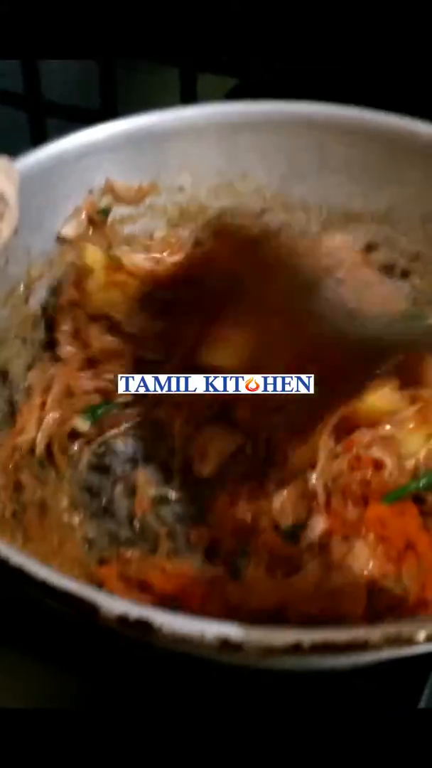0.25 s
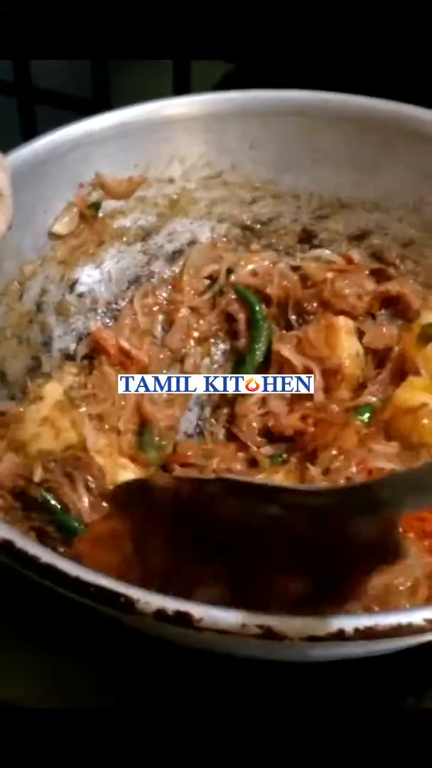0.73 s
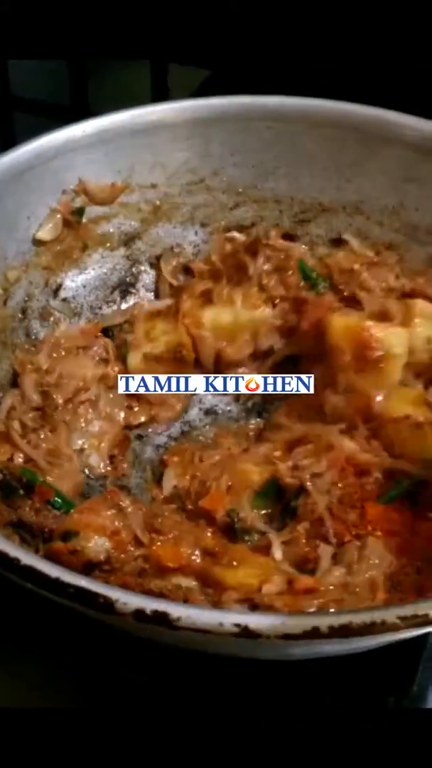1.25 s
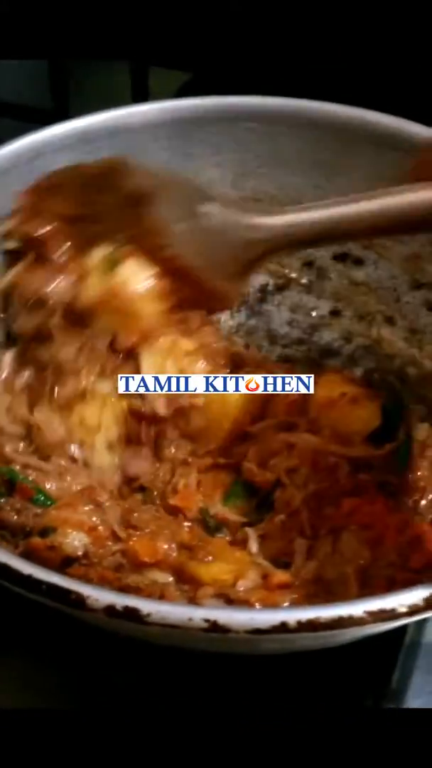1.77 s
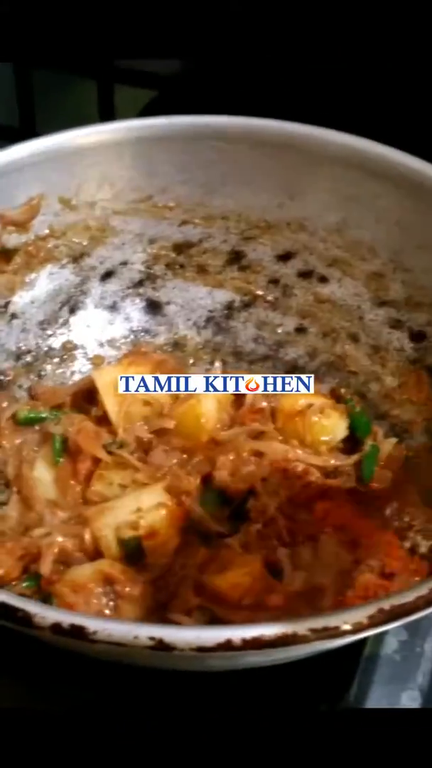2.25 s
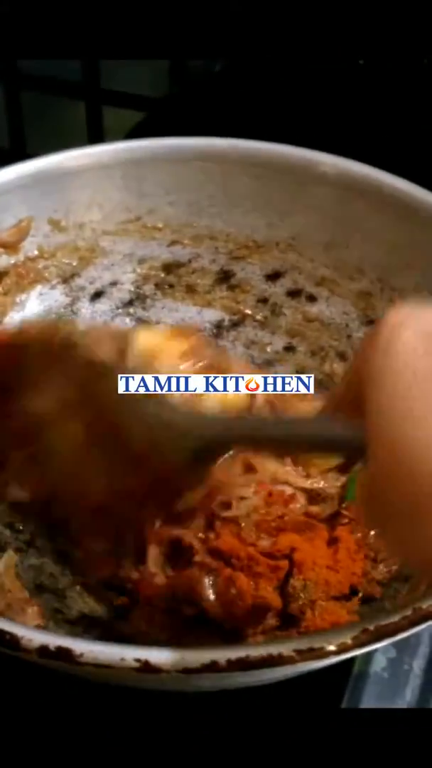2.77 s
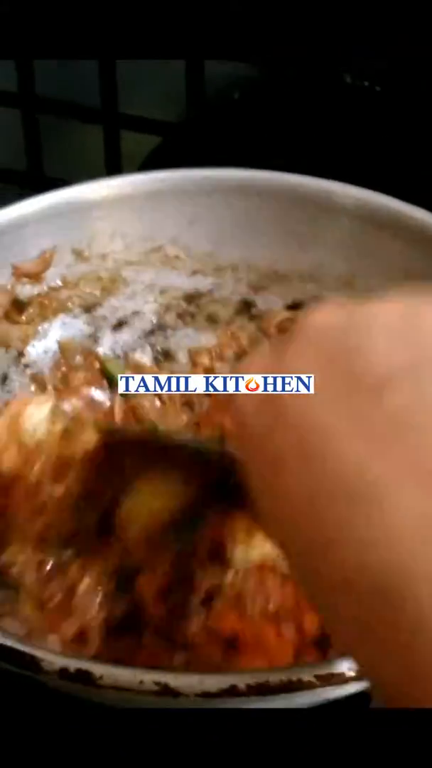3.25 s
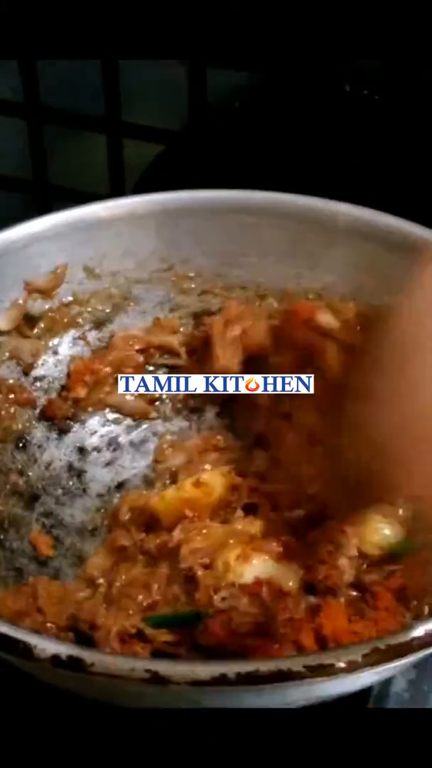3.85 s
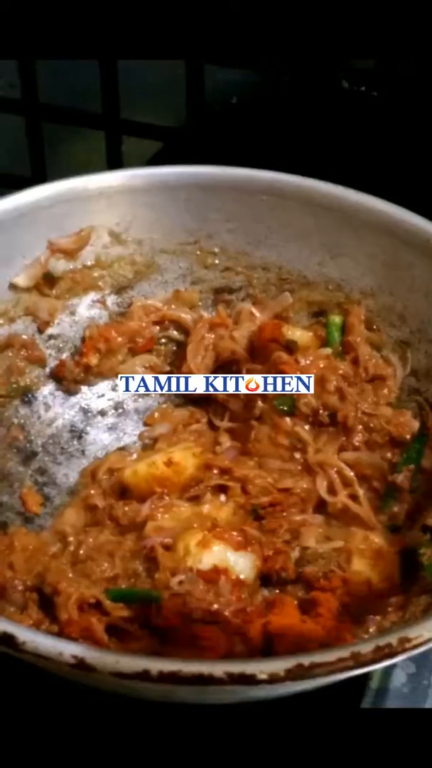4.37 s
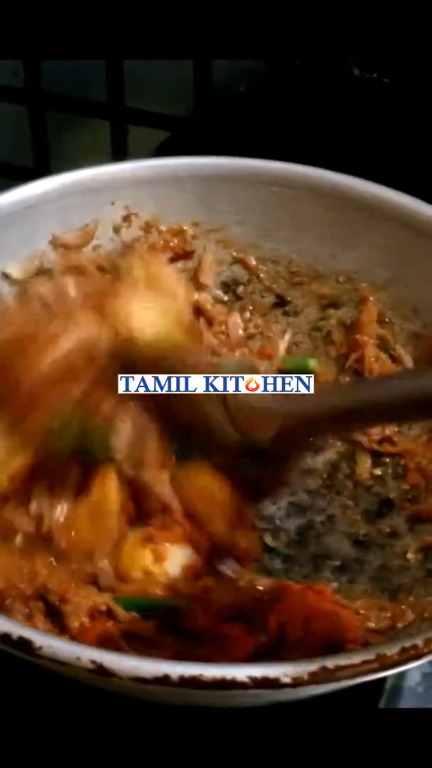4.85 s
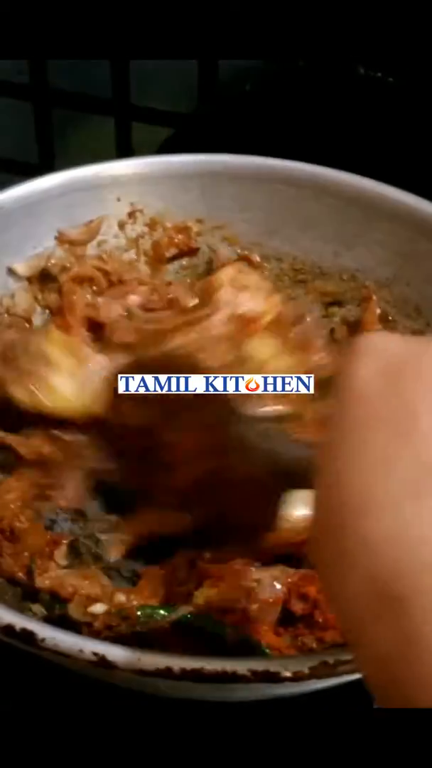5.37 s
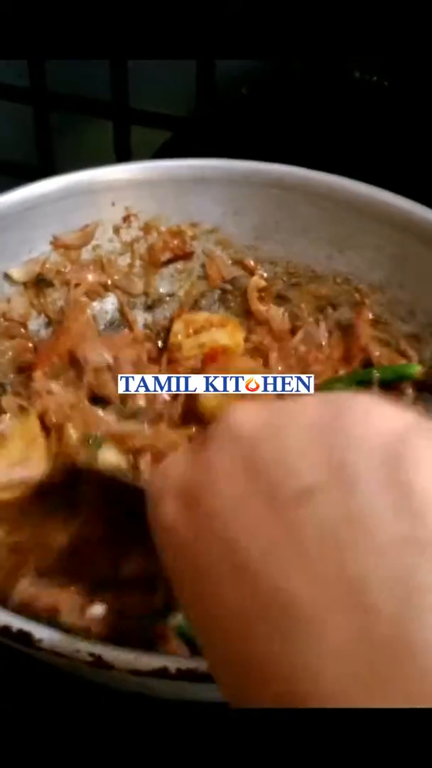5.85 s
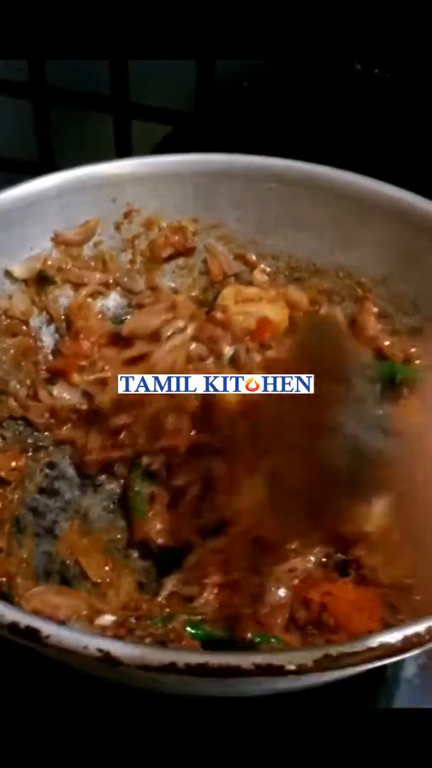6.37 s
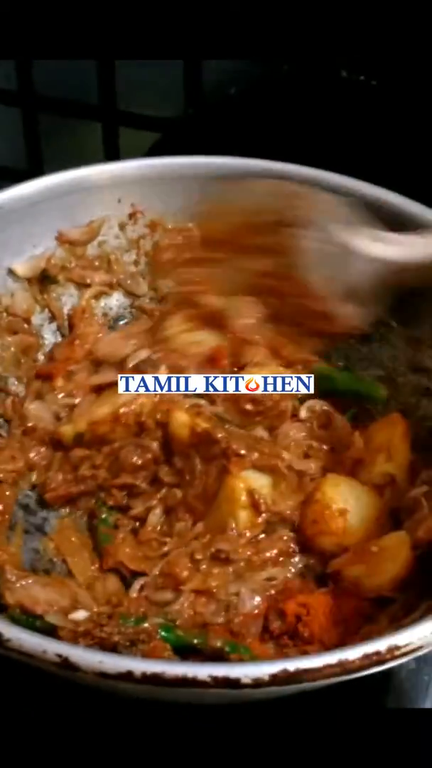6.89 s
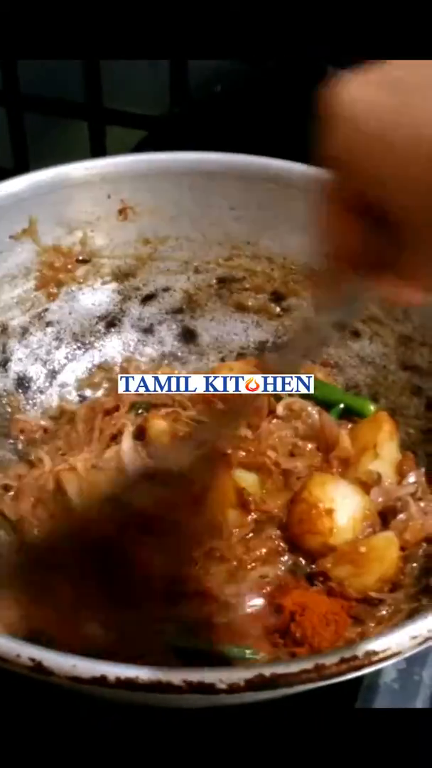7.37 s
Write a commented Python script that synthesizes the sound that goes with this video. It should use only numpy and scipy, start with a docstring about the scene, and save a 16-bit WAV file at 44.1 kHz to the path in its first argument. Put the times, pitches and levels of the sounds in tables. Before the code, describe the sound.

A faint household rush and barely audible rubbing come first. Then a metal ladle knocks a thin aluminium pan and drags along it in short, uneven strokes, rasping on the wall and groaning low through thick food. Dull bumps and faint crackles join in, with quieter gaps between bursts. Close stereo phone pickup in a small kitchen, the metallic rasp brighter on the right.

```python
"""A faint household rush and mains hum come first, with barely audible scraping; then knocks and rasping drags.
A metal ladle stirs thick paste in an aluminium pan, close to a two-microphone phone in a small kitchen.
Its edge knocks the pan wall, then drags along it: stick-slip friction shakes the food-damped pan,
whose low modes groan and whose thin wall rasps. Dull bumps, rubs and faint crackles join in.
The right microphone faces the pan and hears far more of its upper middle."""
import sys
import numpy as np
from scipy import signal
from scipy.fft import rfft, irfft, next_fast_len
from scipy.io import wavfile
from scipy.ndimage import uniform_filter1d, map_coordinates

SR = 44100
rng = np.random.default_rng(int(sys.argv[2]) if len(sys.argv) > 2 else 0)


def to_wav(sig):
    """Store sig (one row per channel, or 1-D mono) as 16-bit WAV at the path in sys.argv[1].

    Samples outside -1..1 are clipped; the rate is SR.
    """
    pcm = np.clip(np.atleast_2d(sig), -1, 1) * 32767
    pcm = np.round(pcm).astype(np.int16)
    wavfile.write(sys.argv[1], SR, pcm.T)  # frames by channels


def convert_level_to_amplitude(level_db):
    """Map a level in decibels to its linear amplitude factor."""
    exponent = np.asarray(level_db, float) / 20
    return 10 ** exponent


N = 336483  # length in samples

# Source levels below are those of the force or ring before the pan modes and microphones colour it.
# Edge drags along the thin wall: t/s, rise/s, drag/s, rasp peak level/dB, centre f/Hz, hiss re rasp level/dB
WALL_DRAGS = [(.02, 0.027, 0.23, -63, 2200, -25), (.522, 0.0046, 0.5, -60.5, 1200, -27),
              (0.631, 0.0043, 0.14, -34.5, 1860, -24.5), (0.958, 0.065, 0.12, -37, 3080, -15),
              (1.366, 0.025, 0.15, -28.5, 2580, -20), (1.5, 0.11, 0.25, -46, 2560, -20),
              (1.63, 0.049, 0.1, -43.5, 1520, -16.5), (1.722, 0.011, 0.079, -35.5, 1500, -20),
              (1.786, 0.0018, 0.27, -41, 2060, -17.5), (2.382, 0.004, 0.11, -35.5, 2300, -17.5),
              (2.62, 0.035, 0.12, -37, 1720, -20.5), (2.67, 0.031, 0.14, -41, 2220, -11.5),
              (3.267, 0.0051, 0.22, -51, 1260, -39), (3.558, 0.0022, 0.057, -32.5, 1494, -15),
              (3.58, 0.045, 0.091, -35.5, 3330, -9), (4.12, 0.0068, 0.11, -37, 2400, -17.5),
              (4.339, 0.0082, 0.077, -35.5, 1210, -32), (4.407, 0.0036, 0.064, -31.5, 2430, -25),
              (4.43, 0.065, 0.05, -37.5, 2830, -17), (4.542, 0.098, 0.15, -34, 2670, -16.5),
              (5.034, 0.003, 0.037, -59, 2550, -14), (5.313, 0.041, 0.096, -48, 3350, -13),
              (5.966, 0.0034, 0.22, -49, 1380, -24), (6.209, 0.011, 0.051, -54, 2050, -28),
              (6.684, 0.0087, 0.034, -24.5, 2590, -27), (6.71, 0.053, 0.27, -37, 2060, -14.5),
              (6.959, 0.083, 0.21, -33.5, 2900, -15.5), (7.088, 0.023, 0.27, -45, 1200, -19)]
# Ladle ploughs over the loaded bottom: t/s, rise/s, drag/s, peak level/dB, centre f/Hz
BOTTOM_DRAGS = [(.03, 0.05, 0.49, -60, 524), (.4, 0.16, 0.0052, -61, 540), (.522, 0.017, 0.15, -42.5, 460),
                (0.631, .005, 0.12, -31, 426), (.72, 0.046, 0.16, -43, 460), (0.95, 0.1, 0.1, -33.5, 526),
                (1.1, 0.037, 0.13, -47, 416), (1.368, 0.0066, 0.22, -36, 600),
                (1.55, 0.2, 0.044, -45.5, 497), (1.785, 0.016, 0.26, -36, 470),
                (1.879, 0.047, 0.063, -28.5, 460), (1.979, 0.013, 0.048, -41, 446),
                (2.04, 0.018, 0.052, -44, 435), (2.276, 0.012, 0.025, -55, 394),
                (2.382, 0.013, 0.12, -38.5, 495), (2.633, 0.0036, 0.24, -45, 670),
                (3.31, 0.0081, 0.16, -50, 287), (3.562, 0.0084, 0.17, -34.5, 352),
                (3.7, 0.028, 0.28, -49.5, 296.5), (4.119, 0.0026, 0.13, -52.5, 414),
                (4.295, 0.02, 0.02, -45, 854), (4.334, 0.0024, 0.081, -28.5, 745),
                (4.409, 0.0098, 0.14, -38.5, 555), (4.56, 0.14, 0.15, -40, 680),
                (5.009, 0.0034, 0.3, -63, 303), (5.149, 0.055, 0.036, -58.5, 317),
                (5.335, 0.022, 0.12, -41.5, 460), (5.529, 0.029, 0.012, -54, 385),
                (5.962, 0.008, 0.19, -37, 563), (6.299, 0.078, 0.12, -53.5, 383),
                (6.55, 0.072, 0.058, -58.5, 268.5), (6.69, 0.0073, 0.048, -34.5, 620),
                (6.72, 0.054, 0.99, -43.5, 585), (7.035, 0.0059, 0.17, -38, 504),
                (7.07, 0.046, 0.18, -35, 664), (7.15, 0.055, 0.05, -32.5, 610),
                (7.229, 0.0064, 0.088, -26, 500), (7.32, 0.013, 0.086, -46.5, 507),
                (7.46, 0.052, 0.033, -60.5, 255)]
# Shapes of a stroke: rise exponent, loss over the drag/dB, curve of the loss (under 1 = early),
# fall after lift-off/(dB/s)
RASP_SHAPE = (0.71, 14.46, 0.93, 260)
HISS_SHAPE = (0.52, 13.9, 1.18, 380)
GROAN_SHAPE = (0.83, 12.8, 0.82, 650)
# Light rubs in one narrow band: t/s, length/s, start f/Hz, end f/Hz, half-width/octave, level before taper/dB
RUBS = [(0.043, 0.15, 1758, 1930, 0.31, -53), (0.935, 0.041, 2037, 2125, 0.35, -42.5),
        (0.961, 0.04, 2003, 1544, 0.46, -38), (1.262, 0.19, 1830, 2160, .35, -52),
        (1.65, 0.05, 1270, 1310, 0.11, -37), (3.141, 0.11, 273, 288, 0.067, -49.5),
        (3.173, 0.042, 1610, 1590, .3, -56), (3.17, 0.094, 2950, 2720, .2, -59.5),
        (3.246, 0.074, 290, 279.6, 0.06, -49), (3.264, 0.039, 4580, 4560, .15, -65),
        (3.27, 0.18, 1410, 1134, 0.51, -54), (5.228, 0.007, 3210, 2800, 0.47, -36),
        (5.243, 0.013, 2886, 2100, 0.72, -35), (5.213, 0.13, 2800, 2480, 0.9, -46.5),
        (5.273, 0.01, 2750, 2260, 0.36, -41), (5.35, 0.0284, 3410, 3166, 0.32, -36.5),
        (7.091, 0.22, 624, 637, 0.027, -32.5)]
# Ladle edge meets the wall: t/s, level/dB, centre f/Hz, then low thud, tick and free ring re that level/dB
KNOCKS = [(0.105, -52, 1920, -10, -26, -22), (0.5235, -57.5, 484, 33.5, -33, -11),
          (0.633, -22, 1310, -17, -23, -10), (0.949, -35, 2100, -17, -31, -30),
          (1.3654, -14, 2540, -9.5, -15.5, -15.5), (1.388, -16.5, 2600, -36, -20, -6),
          (1.4206, -17.5, 3670, -11, -13, -14), (1.422, -23.5, 1080, -25, -26, -2.5),
          (1.735, -26.5, 1650, -6, -38, -11), (1.767, -27, 1500, -20, -11, -25),
          (1.791, -30, 3400, -34, -7, -19), (2.382, -14, 2620, -16.5, -15.5, -12.5),
          (3.267, -48.5, 1310, 10.5, -19, -19), (3.5605, -8, 1550, -19, -16, -17.5),
          (4.121, -18, 2560, -21, -20.5, -18), (4.341, -28, 1740, 7, -31, -14),
          (4.4095, -18.5, 2220, -12, -20.5, -12.5), (4.592, -27, 3270, -28.5, -9.5, -8.5),
          (5.038, -48.5, 3600, -35, -21.5, -21), (5.967, -38.5, 600, 8, -8.5, -33),
          (6.6873, -15, 2460, -4.5, -13.5, -22.5), (6.713, -28, 2930, -25, -22, -7),
          (6.996, -38, 3130, -18, 6, -18), (7.0356, -16.5, 2840, -37, -20, -12),
          (7.482, -56.5, 3700, 7, 1, -38)]
# Dull bumps, pan rocking on the stove or food thudding on its wall: t/s, level before onset smoothing/dB, f/Hz
BUMPS = [(0.158, -57, 100.4), (0.636, -36.5, 194.5), (1.02, -24, 478), (1.04, -29, 390), (1.068, -27, 555),
         (1.917, -31, 523), (1.936, -26, 395), (2.278, -60, 91), (2.382, -45, 185), (2.85, -65, 107),
         (3.387, -53, 111), (3.561, -40.5, 197.5), (3.915, -55.5, 199), (3.93, -55, 69.6), (3.988, -61, 81),
         (5.38, -55.5, 190), (5.384, -31, 398), (5.559, -56.5, 160), (5.973, -27.5, 377), (6.567, -56, 163),
         (6.631, -49, 195), (7.488, -56, 157)]
# Clear modes of the pan: f/Hz, bandwidth/Hz, relative level/dB
PAN_MODES = [(185, 18.6, 1.5), (273.2, 34, 9.5), (345, 54.5, 14.5), (460, 65, 0.5), (502, 6.8, 5),
             (633.6, 8.5, -0.5), (710, 34, -5.5), (920, 21, 3), (1073, 14, 5), (1488, 28, 7),
             (1625, 65, -1.5), (2506, 13.4, 7.5), (2620, 18, 2.5), (2940, 9.9, 4), (3297, 78, 6),
             (3570, 29, 10.5)]
# Relative spectral densities of the groan, rasp and hiss: f/Hz, level/dB per Hz
GROAN_COLOUR = [(59, -105), (100, -53), (293, -13), (340, -11), (613, -8.5), (861, -9), (953, -13.5),
                (1500, -20.5), (1950, -37.5), (3300, -120)]
RASP_COLOUR = [(410, -46), (700, -9.5), (973, -3), (1080, 8.5), (1420, -4), (2950, -1.5), (3660, -2.5),
               (5000, -22.5), (6500, -43.5), (11000, -120)]
HISS_COLOUR = [(2650, -24), (4500, 2), (5910, -1), (8730, -12.5), (10600, -13.5), (13700, -23),
               (14400, -19)]
# Decay times to -60 dB, of the pan under food and of the kitchen: f/Hz, t60/s
PAN_DECAY = [(200, 0.17), (600, 0.15), (2500, 0.0083), (5000, 0.021), (12000, 0.21)]
KITCHEN_DECAY = [(200, 0.13), (700, 0.45), (2000, 0.35), (10000, 0.061)]
# Likeness of left and right microphones (1 = same, 0 = unrelated): f/Hz, correlation
LIKENESS = [(60, 0.51), (230, 1), (920, 0.19), (3580, -0.026), (14000, 0.015)]
# Left minus right, for the pan and for the background: f/Hz, level/dB
PAN_BALANCE = [(60, -18), (150, -2.5), (370, 1.5), (920, -3), (2270, -15.5), (5630, -9), (14000, -7)]
BACKGROUND_BALANCE = [(60, 0), (230, 2.5), (920, -5.5), (3580, -9), (14000, 4.5)]
# Relative spectral density of the household rush: f/Hz, level/dB per Hz
RUSH_COLOUR = [(15, -31), (25, -17.5), (184, 0.5), (367, -6), (442, -0.5), (677, -5.5), (773, -7),
               (860, -12.5), (1910, -12.5), (2490, -10.5), (3500, -14), (4360, -24), (11700, -28.5),
               (14400, -35)]
# Mains hum: f/Hz, rms level/dB
HUM = [(100, -85)]


def scrapes():
    """Stick-slip friction: slow heavy slips drive the groan, fast fine ones the rasp and hiss."""
    *_, low_db, low_hz = np.transpose(BOTTOM_DRAGS)[..., None]
    *_, wall_db, wall_hz, edge_db = np.transpose(WALL_DRAGS)[..., None]
    groan_db, groan_hz = overlap(low_db + pressure_db(BOTTOM_DRAGS, GROAN_SHAPE), low_hz)
    rasp_db, rasp_hz = overlap(wall_db + pressure_db(WALL_DRAGS, RASP_SHAPE), wall_hz)
    hiss_db, _ = overlap(wall_db + edge_db + pressure_db(WALL_DRAGS, HISS_SHAPE))

    def hump_db(level_db, heavy_db):
        """Modal selectivity: the lighter the touch, the fewer modes it reaches."""
        return heavy_db + 0.5 * np.clip(-44.5 - level_db, 0, 30)

    heavy = slips(N, 220, spread_db=2.5, smooth=0.78)
    fine = slips(N, 600, spread_db=1.2, smooth=1.05)
    groan = gliding(heavy, GROAN_COLOUR, groan_hz, 0.7, hump_db(groan_db, heavy_db=9.0), size=1024)
    rasp = gliding(fine, RASP_COLOUR, rasp_hz, 0.87, hump_db(rasp_db, heavy_db=7.5), size=256)
    hiss = coloured(fine, HISS_COLOUR)
    force = convert_level_to_amplitude(groan_db) * groan + convert_level_to_amplitude(rasp_db) * rasp + convert_level_to_amplitude(hiss_db) * hiss + rubs()

    # the contact moves on every 46 ms, crossfading at steady power
    hop = 2048
    places = contacts(direct=0.6, count=32)
    force = np.pad(force, (hop, 2 * hop))
    fade = np.sqrt(signal.windows.hann(2 * hop, sym=False))
    out = np.zeros((2, len(force)))
    for i in range(0, N + hop, hop):
        place = places[i // hop % len(places)]
        add(out, i / SR, pan(force[i:i + 2 * hop] * fade, place))
    return out[:, hop:hop + N]


def slips(size, per_s, spread_db, smooth):
    """Stick-slip as a random point process: sparse uneven jolts on even rubbing, in clumps some 20 ms long."""
    chance, scale = rng.random(size), rng.exponential(size=size)
    sign = rng.standard_normal((2, size))
    jolts = (chance < per_s / SR) * convert_level_to_amplitude(spread_db * np.minimum(scale, 3)) * sign[0]
    clumps_db = 2.2 * map_coordinates(rng.standard_normal(size // 900 + 4), [np.arange(size) / 900])
    return unit(convert_level_to_amplitude(clumps_db) * (unit(jolts) + smooth * sign[1]))


def pressure_db(rows, shape):
    """Contact load: each stroke swells, slackens as it drags and dies at lift-off; dB re peak, one row a stroke."""
    steep, drag_db, early, fall_db_per_s = shape
    s, rise, drag = np.array(rows)[:, :3].T[..., None]
    since = np.arange(0, N / SR, 0.001) - s  # one value a millisecond
    swell = 20 * steep * np.log10(np.clip(since / rise, 1e-6, 1))
    slackening = drag_db * np.clip((since - rise) / drag, 0, 1) ** early
    lift_off = fall_db_per_s * np.maximum(since - rise - drag, 0)
    return swell - slackening - lift_off


def overlap(levels_db, centre_hz=1):
    """Incoherent addition: strokes add in power, and the loudest weighs most on the centre; one value a sample."""
    power = convert_level_to_amplitude(2 * np.maximum(levels_db, -150))
    total = power.sum(axis=0)
    centre = (power * centre_hz).sum(axis=0) / total
    ms = np.arange(N) * 1000 / SR
    return [np.interp(ms, np.arange(len(total)), v) for v in (10 * np.log10(total), centre)]


def favoured(hz, centre_hz, octaves, lift_db):
    """Modal excitation: the place of contact favours the modes near its centre, as a broad hump."""
    return lift_db * np.exp(-(np.log2((hz + 1) / centre_hz) / octaves) ** 2)


def gliding(x, spectrum, centre_hz, octaves, lift_db, size):
    """Time-varying filtering: a spectrum with a hump of moving centre and height, at steady power."""
    hz, t, z = signal.stft(x, SR, nperseg=size)
    at = np.minimum((t * SR).astype(int), len(x) - 1)
    hump = favoured(hz[:, None], centre_hz[at], octaves, lift_db[at])
    gain = convert_level_to_amplitude(along(spectrum, hz)[:, None] + hump)
    gain = gain / np.sqrt(np.mean(gain ** 2, axis=0))
    return signal.istft(z * gain, SR, nperseg=size)[1][:len(x)]


def rubs():
    """Narrow-band roughness: a dense bundle of close partials beats as it glides together."""
    force = np.zeros(N)
    for s, length, from_hz, to_hz, octaves, db in RUBS:
        u = np.arange(round(length * SR)) / (length * SR)
        spread = 2 ** (octaves * rng.triangular(-1, 0, 1, (400, 1)))
        start = rng.random((400, 1))
        turns = np.cumsum(from_hz * (to_hz / from_hz) ** u) / SR
        bundle = unit(np.sin(2 * np.pi * (spread * turns + start)).sum(axis=0))
        taper = np.minimum(u / 0.37, 1) * (1 - u) ** 0.7
        add(force, s, convert_level_to_amplitude(db) * bundle * taper)
    return force


def knocks():
    """Impact: a few milliseconds of chatter as the edge lands, and the free vibration it leaves."""
    out = np.zeros((2, N))
    lead = 256  # samples of room ahead of the blow for the filters
    t = np.arange(1024) / SR
    places = contacts(direct=2.0, count=len(KNOCKS))
    for (s, db, centre_hz, thud_db, tick_db, ring_db), place in zip(KNOCKS, places):
        chatter = rng.standard_normal(len(t)) * convert_level_to_amplitude(-60 * t / 0.027) * np.minimum(t / 0.0008, 1)
        blow = even(np.pad(chatter, (lead, lead)), size=16)
        clank = filtered(coloured(blow, RASP_COLOUR),
                         lambda hz: convert_level_to_amplitude(favoured(hz, centre_hz, octaves=0.25, lift_db=7)))
        thud = filtered(coloured(blow, GROAN_COLOUR),
                        lambda hz: convert_level_to_amplitude(favoured(hz, centre_hz, octaves=0.67, lift_db=24.0)))
        tick = coloured(blow, HISS_COLOUR)
        parts = zip((0, thud_db, tick_db), (clank, thud, tick))
        force = sum(convert_level_to_amplitude(level) * part / np.abs(part).max() for level, part in parts)
        crash = pan(force, place)
        add(out, s - lead / SR, convert_level_to_amplitude(db + max(thud_db, 0)) * crash / np.abs(crash).max())
        add(out, s, convert_level_to_amplitude(db + ring_db) * ring(centre_hz))
    return out


def ring(centre_hz):
    """Free vibration: clear modes near the blow's centre decay, with another phase at each microphone."""
    hz, width, db = np.transpose(PAN_MODES)[..., None]
    t = np.arange(SR // 5) / SR
    hump = favoured(hz, centre_hz, octaves=0.24, lift_db=11.5)
    reach = convert_level_to_amplitude(db - 23.5 + hump + rng.normal(0, 1.57, hz.shape))
    phase = 2 * np.pi * rng.random((2, len(hz), 1))
    partials = reach * np.exp(-np.pi * width * t) * np.sin(2 * np.pi * hz * t + phase)
    return partials.sum(axis=1) * np.minimum(t / 0.0003, 1)


def contacts(direct, count):
    """Impulse responses of the pan at many places of contact: a short crack and a dense damped ring."""
    tails = dying(PAN_DECAY, size=5120, count=count)
    crack = rng.standard_normal((count, 2, 128)) * convert_level_to_amplitude(-60 * np.arange(128) / SR / 0.003)
    crack = even(crack, size=3)
    tails[..., :128] += direct * crack / np.linalg.norm(crack, axis=2, keepdims=True)
    tails = even(tails, size=48) * (np.arange(tails.shape[-1]) < 4600)
    return tails / np.linalg.norm(tails, axis=2, keepdims=True)


def pan(force, answer):
    """Linear response: a force convolved with one impulse response of the pan."""
    return signal.fftconvolve(force[None], answer, axes=1)


def modes(hz):
    """Modal superposition: the pan's clearest resonances stand over its dense ring."""
    small = (1j * hz / (90 + 1j * hz)) ** 2  # so small a pan sends out no deep bass
    resonances = sum(convert_level_to_amplitude(db - 13.5) * 1j * hz * width / (centre ** 2 - hz * hz + 1j * hz * width)
                     for centre, width, db in PAN_MODES)
    return small * 0.7 + resonances


def bumps():
    """Damped oscillation: low swings of the whole pan, of which the higher ones die sooner."""
    out = np.zeros(N)
    t = np.arange(SR // 4) / SR
    for s, db, hz in BUMPS:
        t60 = 0.23 * min(200 / hz, 1) ** 1.7
        onset = (1 - np.exp(-t / 0.0032)) ** 2
        add(out, s, convert_level_to_amplitude(db - 60 * t / t60) * onset * np.sin(2 * np.pi * hz * t))
    return out


def kitchen(x):
    """Reverberation: the walls answer after a few milliseconds with a diffuse decaying tail."""
    delayed = np.pad(x, ((0, 0), (300, 0)))
    tail = dying(KITCHEN_DECAY, size=SR // 2, count=1)[0]
    return signal.fftconvolve(delayed, tail, axes=1)[:, :N]


def background():
    """Diffuse noise: distant household rush in drifting patches, crackles of the hot food, and a mains hum."""
    z = signal.stft(rng.standard_normal((2, N)), nperseg=512)[2]
    patches = uniform_filter1d(rng.standard_normal(z.shape[1:]), size=6, axis=0)
    patches = uniform_filter1d(patches, size=12, axis=1)
    pair = signal.istft(z * convert_level_to_amplitude(3.2 * unit(patches)), nperseg=512)[1][:, :N]
    rush = convert_level_to_amplitude(-66) * two_ears(coloured(unit(pair), RUSH_COLOUR), BACKGROUND_BALANCE)
    jolts = np.array([slips(N, 150, spread_db=3.5, smooth=0) for _ in pair])
    crackle = two_ears(convert_level_to_amplitude(-78.5) * coloured(jolts, RASP_COLOUR), PAN_BALANCE)
    t = np.arange(N) / SR
    hum = sum(convert_level_to_amplitude(db) * np.sqrt(2) * np.sin(2 * np.pi * hz * t) for hz, db in HUM)
    return rush + crackle + hum


def two_ears(pair, balance):
    """Partial coherence: two unrelated signals mixed to the likeness and balance of the microphones."""
    def mid_side(hz):
        turn = np.arccos(np.clip(along(LIKENESS, hz), -1, 1)) / 2
        return np.array([np.cos(turn), np.sin(turn)])

    mid, side = filtered(pair, mid_side)
    return filtered(np.array([mid + side, mid - side]),
                    lambda hz: convert_level_to_amplitude(np.outer([0.5, -0.5], along(balance, hz))))


def dying(t60s, size, count):
    """Frequency-dependent decay: pairs of unit-energy noise tails, each frequency dying at its own speed."""
    hz, t, z = signal.stft(rng.standard_normal((count, 2, size)), SR, nperseg=128)
    fall = convert_level_to_amplitude(-60 * t / along(t60s, hz)[:, None])
    fall = fall / np.linalg.norm(fall, axis=1, keepdims=True)  # equal energy at every frequency
    tail = signal.istft(z * fall, SR, nperseg=128)[1]
    return tail / np.linalg.norm(tail, axis=2, keepdims=True)


def even(x, size):
    """Spectral whitening: irons the chance lumps out of a short random sound's spectrum."""
    z = rfft(x)
    power = np.abs(uniform_filter1d(np.abs(z) ** 2, size, axis=-1))
    return irfft(z / np.sqrt(power + 1e-20), x.shape[-1])


def coloured(x, spectrum):
    """Spectral shaping at unchanged power for white input."""
    gain = convert_level_to_amplitude(along(spectrum, np.arange(0, SR / 2, 10)))
    return filtered(x, lambda hz: convert_level_to_amplitude(along(spectrum, hz))) / np.sqrt(np.mean(gain ** 2))


def filtered(x, response):
    """Linear filtering: the spectrum of x times a response of frequency."""
    m = next_fast_len(x.shape[-1] + 4096)
    return irfft(rfft(x, m) * response(np.fft.rfftfreq(m, 1 / SR)), m)[..., :x.shape[-1]]


def along(points, hz):
    """Logarithmic frequency scale: (f/Hz, value) points interpolated on it."""
    f, v = np.transpose(points)
    return np.interp(np.log(hz + 1), np.log(f + 1), v)


def unit(x):
    """Power normalisation: x at rms 1."""
    return x / np.sqrt(np.mean(x ** 2) + 1e-20)


def add(out, s, sound):
    """Superposition: mixes a sound in from time s."""
    i = round(s * SR)
    out[..., i:i + sound.shape[-1]] += sound[..., :out.shape[-1] - i]


def scene():
    """Superposition of the ladle on the pan, the room's answer, the bumps and the background."""
    ladle = filtered(scrapes() + knocks(), modes)
    heard = two_ears(ladle + convert_level_to_amplitude(-10.5) * kitchen(ladle), PAN_BALANCE)
    return heard + bumps() + background()


def band_limit(x):
    """A steep low-pass at the top of the band."""
    return signal.sosfilt(signal.butter(12, 14570, fs=SR, output="sos"), x)


def record(dry):
    """Band limitation: the phone keeps nothing from 14.3 kHz up."""
    mix = filtered(dry, lambda hz: hz < 14300)
    return band_limit(mix)


dry = scene()
out = record(dry)
to_wav(out)
```